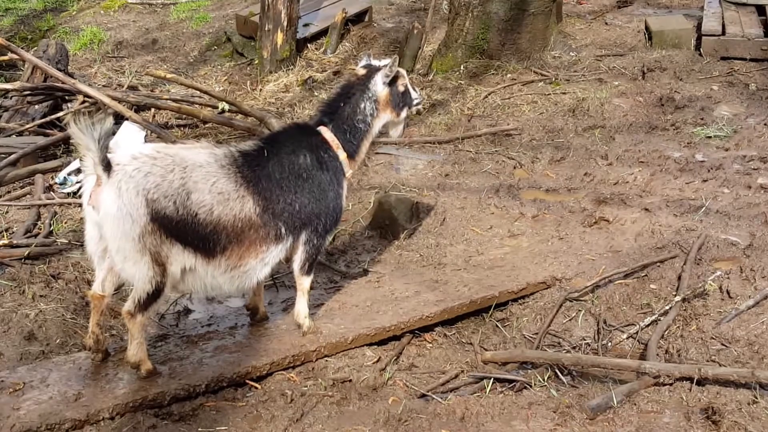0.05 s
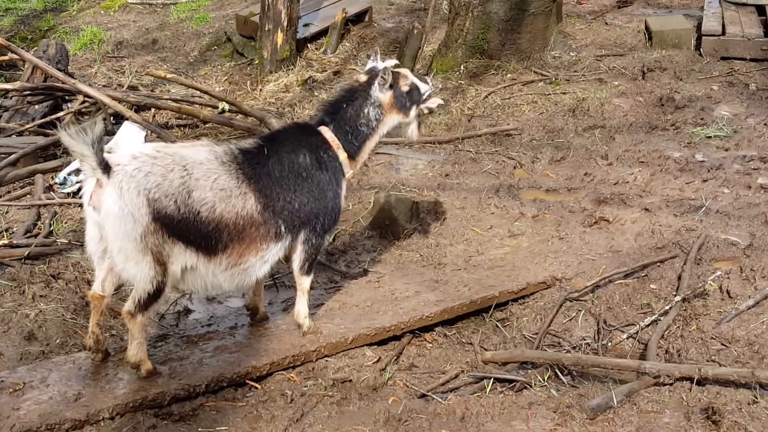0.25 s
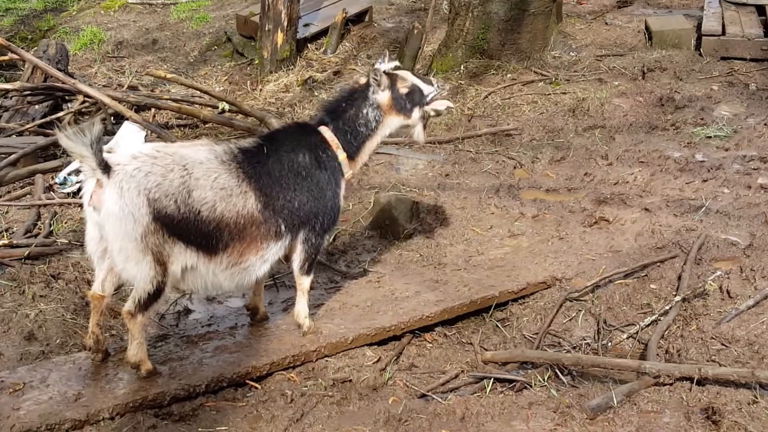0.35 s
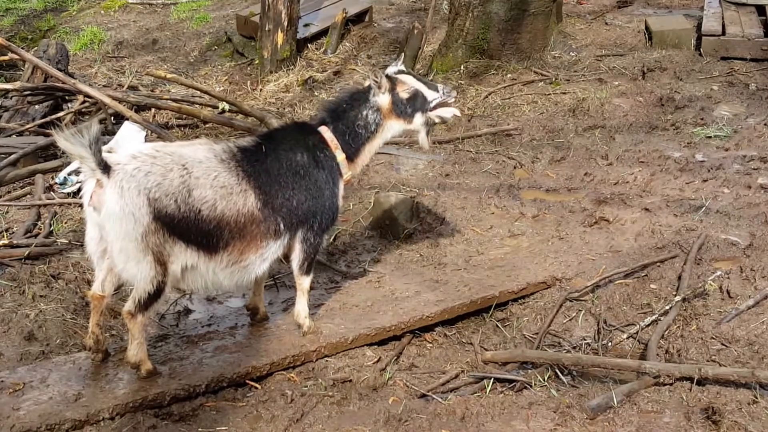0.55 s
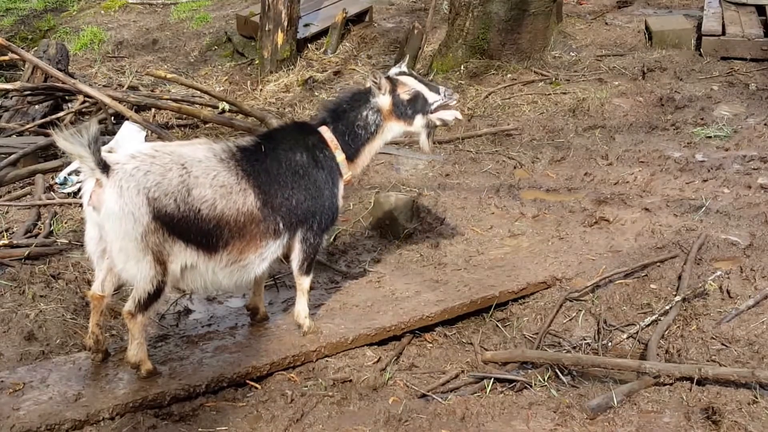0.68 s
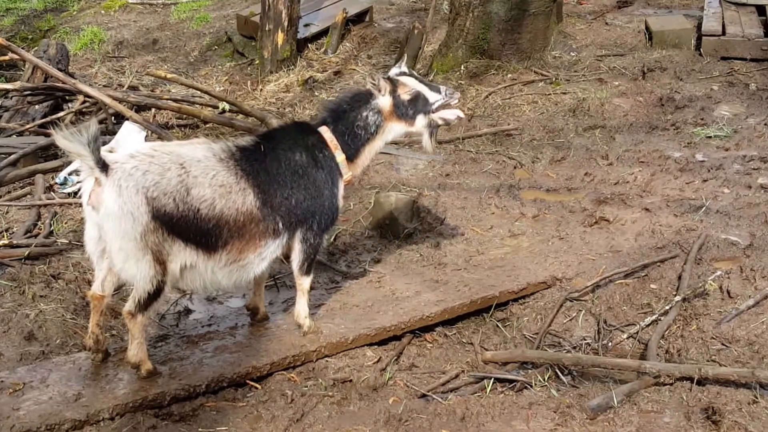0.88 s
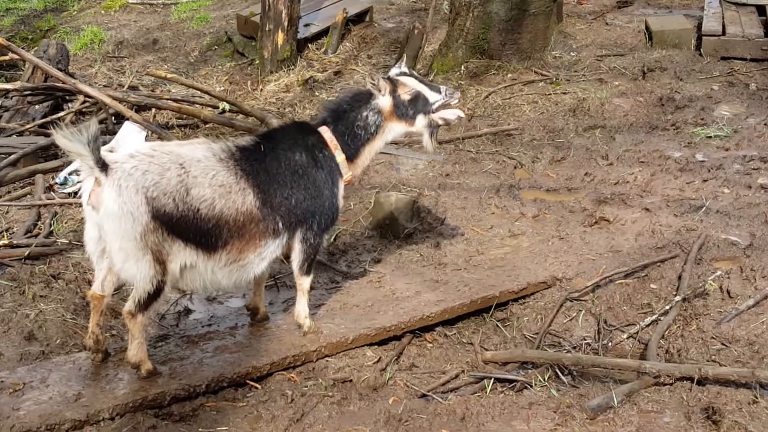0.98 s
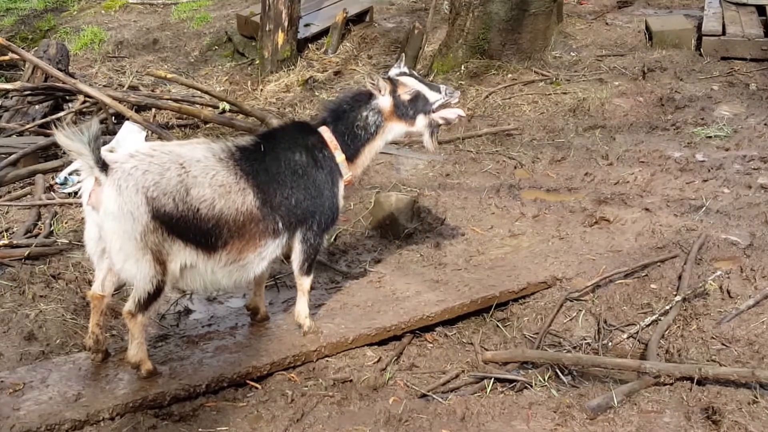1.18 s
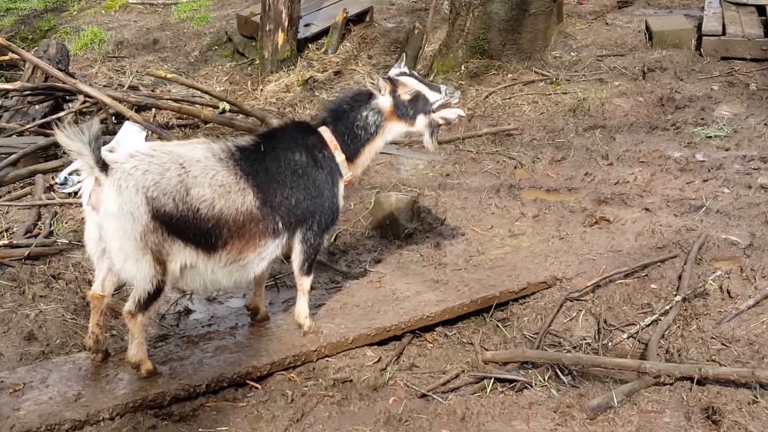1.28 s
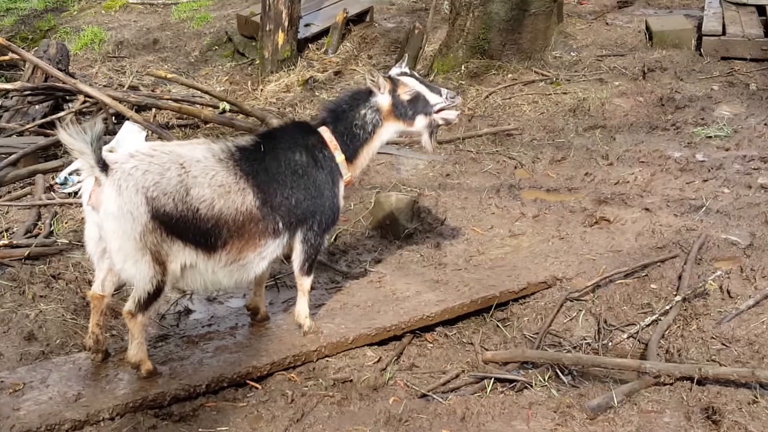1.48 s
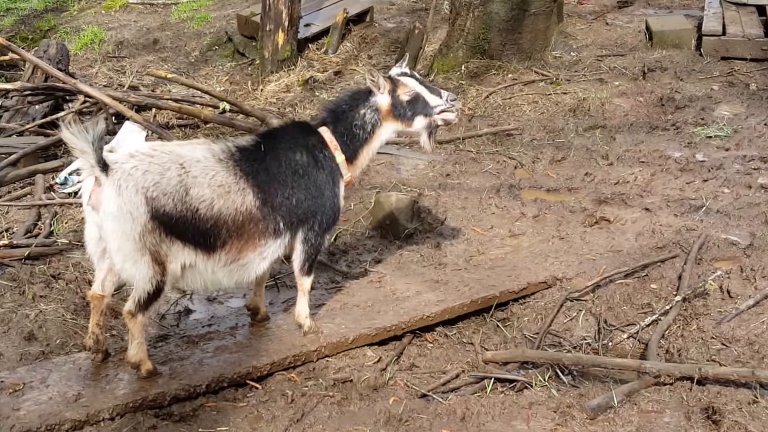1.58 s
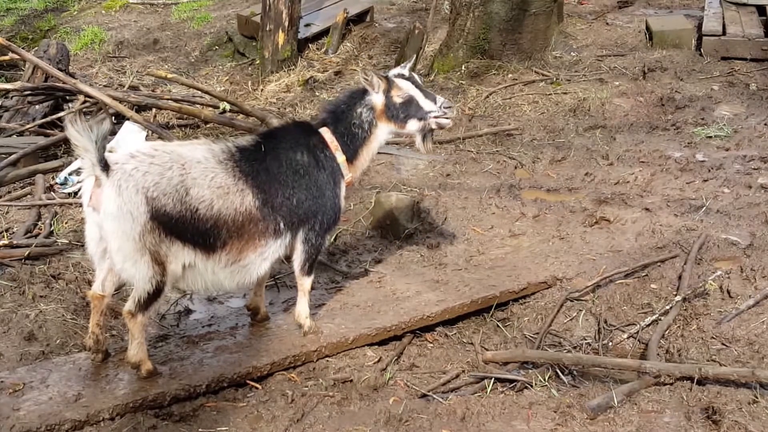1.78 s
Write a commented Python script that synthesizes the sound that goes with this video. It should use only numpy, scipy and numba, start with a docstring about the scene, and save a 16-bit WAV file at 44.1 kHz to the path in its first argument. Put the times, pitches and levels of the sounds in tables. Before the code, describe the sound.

One goat bleats a few metres away: a brief creaky start, a long rough scream, then a clearer wavering note that sinks and stops in a puff of breath. Quiet yard, light wind rumble on the stereo microphone.

```python
"""Goat bleating in a yard

A goat a few metres away gives one long bleat: a creaky start, a harsh irregular scream, then a clear
wavering note that sinks as the mouth closes. Vocal fold pulses and noise ring parallel resonances, with
breath hiss on top. Light wind rumbles at two microphone ports as shaped noise, sheds and trees return
a short broadband tail of scattered echoes, and a faint far hiss of steady noise lies under all."""
import sys
import numpy as np
from scipy import signal
from scipy.fft import rfft, irfft
from scipy.io import wavfile
from scipy.ndimage import uniform_filter1d
from numba import njit

SR = 44100
rng = np.random.default_rng(int(sys.argv[2]) if len(sys.argv) > 2 else 0)


def transcribe(signal):
    """Save signal, clipped to [-1, 1], as a 16-bit WAV file at the path in sys.argv[1]."""
    frames = np.atleast_2d(signal).T
    limited = np.clip(frames, -1, 1)
    pcm = np.round(limited * 32767).astype(np.int16)
    wavfile.write(sys.argv[1], SR, pcm)


def linear_from_db(decibels):
    """Turn decibels (scalar or array-like) into linear amplitude factors; 0 gives 1."""
    return 10 ** (np.asarray(decibels, float) / 20)


N = 81585


def rms_one(x):
    """Power normalisation: scale to rms 1."""
    return x / np.sqrt(np.mean(x ** 2) + 1e-20)


def in_time(rows):
    """Linear interpolation: the columns of a table as per-sample curves."""
    s, *columns = np.transpose(rows)
    return [np.interp(np.arange(N) / SR, s, c) for c in columns]


def at_hz(points, hz):
    """Interpolation of a table on a log-frequency axis."""
    table_hz, value = np.transpose(points)
    return np.interp(np.log(hz + 1), np.log(table_hz + 1), value)


def drift(rate_hz):
    """Low-passed noise: a slow random wander of rms 1, through two equal poles with run-in."""
    r = np.exp(-2 * np.pi * rate_hz / SR)
    return rms_one(signal.lfilter([1], [1, -2 * r, r * r], rng.standard_normal(2 * N))[N:])


def coloured(spectrum, x):
    """Spectral shaping: weight a flat signal by a table, silent outside its ends; rms 1."""
    hz = np.arange(N // 2 + 1) * SR / N
    inside = (hz > spectrum[0][0]) & (hz < spectrum[-1][0])
    return rms_one(irfft(rfft(x) * linear_from_db(at_hz(spectrum, hz)) * inside, N))


# Irregularity of the vocal folds. Each row: time in seconds, roughness from 0 to 1.
ROUGHNESS = [(.23, 1), (.34, .8), (.365, 1), (1.07, .9), (1.11, .2), (1.15, .2), (1.17, .45), (1.195, .2),
             (1.225, .2), (1.24, .35), (1.3, .35), (1.325, .05), (1.365, .06), (1.39, .35), (1.415, 1)]
# Mean vocal fold rate in the scream. Each row: time in seconds, rate in Hz.
SCREAM_RATE = [(.235, 316.1), (.28, 314.6), (.34, 333), (.365, 298), (.4, 302.5), (.445, 329.1),
               (.47, 303.3), (.6, 296.2), (1.0, 296.2), (1.07, 305)]
# Mean vocal fold rate in the clear note. Each row: time in seconds, rate in Hz.
NOTE_RATE = [(1.09, 316.8), (1.112, 315.7), (1.124, 322.7), (1.142, 341.6), (1.16, 348.2), (1.176, 329.7),
             (1.188, 330.3), (1.21, 319.1), (1.252, 339.3), (1.272, 331.7), (1.304, 328.5), (1.32, 318.8),
             (1.362, 314.2), (1.384, 291.1), (1.4, 270.0), (1.416, 242.2), (1.46, 236.2)]
VOICE_ON_S, VOICE_OFF_S = .232, 1.45
CREAK_PULSES, CREAK_START_S, CREAK_PERIOD_S = 10, .152, .0082
JITTER, JITTER_HZ = .09, 110   # relative wander of the fold rate at full roughness
SHIMMER_DB = 3   # largest random change of pulse strength at full roughness
ALTERNATE_DB, ALTERNATE_HZ = 3.5, 12   # spells of strong-weak pulses in the rough voice


def fold_pulses(rate, rough):
    """Quasi-periodic excitation: slow creaks, then closures with jitter, shimmer and alternation."""
    turns = np.cumsum(rate * (1 + JITTER * rough ** 1.3 * drift(JITTER_HZ))) / SR
    at = np.interp(np.arange(1, int(turns[-1])), turns, np.arange(N))
    at = at[(at > VOICE_ON_S * SR) & (at < VOICE_OFF_S * SR)]
    whole = at.astype(int)
    shimmer_db = SHIMMER_DB * rng.uniform(-1, 1, len(at))
    spells = np.clip(drift(ALTERNATE_HZ)[whole], 0, 1.5)
    alternate_db = ALTERNATE_DB * spells * (-1.) ** np.arange(len(at))
    # the square root of the period keeps the power independent of the rate
    size = linear_from_db(rough[whole] * (shimmer_db + alternate_db)) * np.sqrt(SR / rate[whole])

    creak_at = (CREAK_START_S + CREAK_PERIOD_S * np.arange(CREAK_PULSES)) * SR
    creak_size = linear_from_db(rng.uniform(-1.8, 1.2, CREAK_PULSES)) * np.sqrt(SR * CREAK_PERIOD_S)
    at, size = np.append(at, creak_at), np.append(size, creak_size)

    # windowed sinc: each pulse falls between samples without aliasing
    taps = np.floor(at)[:, None] + np.arange(-8, 9)
    off = taps - at[:, None]
    shape = size[:, None] * np.sinc(off) * np.cos(np.pi * off / 18) ** 2
    return np.bincount(taps.astype(int).ravel(), shape.ravel(), N)[:N]


FOLD_NOISE = .7   # noise share of the excitation at full roughness
STEADY_LEAK = .3   # share of fold noise between the puffs
NOISE_FROM_HZ, NOISE_LOW_SHARE = 1300, .45   # fold noise is weaker in the lows


def fold_noise(pulses, rough):
    """Pulse-modulated turbulence: noise in decaying puffs; returns noise, pulse share and puffs."""
    puffs = rms_one(signal.lfilter([1], [1, -np.exp(-1 / (.0026 * SR))], np.abs(pulses)))   # 2.6 ms decay
    share = FOLD_NOISE * rough
    white = (STEADY_LEAK + (1 - STEADY_LEAK) * puffs) * rng.standard_normal(N)
    high = signal.lfilter(*signal.butter(2, NOISE_FROM_HZ, "high", fs=SR), white)
    noise = share * (NOISE_LOW_SHARE * white + (1 - NOISE_LOW_SHARE) * high)
    return noise, np.sqrt(1 - share ** 2), puffs


@njit
def resonance(x, hz, r, sr):
    """Two-pole resonance whose centre and width move sample by sample."""
    y = np.zeros(len(x))
    for i in range(2, len(x)):
        drive = (1 - r[i] ** 2) / 2 * (x[i] - x[i - 2])
        ring = 2 * r[i] * np.cos(2 * np.pi * hz[i] / sr) * y[i - 1]
        y[i] = drive + ring - r[i] ** 2 * y[i - 2]
    return y


# Throat and mouth resonances, each passed twice, before the movements computed below.
# Each row: centre in Hz, width in Hz, gain in dB.
RESONANCES = [(553.6, 129, -15.5), (897.3, 181, 5.5), (1607, 263, -9.5), (2047.4, 216, 2.5),
              (3018, 593, -2), (3346, 252, -2.5), (3883, 157, 4.5), (4049, 97, 0.5), (410.4, 79, -19.5),
              (5830, 62, -30.5)]
# Gain movement of each resonance: 0 steady, 1 follows the lowest-resonance column of the effort,
# 2 follows its upper column, 3 grows with roughness.
GAIN_GROUPS = [3, 1, 0, 0, 0, 0, 2, 2, 3, 0]
# Closing of the mouth. Each row: time in seconds, scale of the lower resonance centres.
MOUTH_CLOSING = [(1.0, 1), (1.15, .99), (1.36, .96), (1.39, .91), (1.44, .76)]
LOWER_RESONANCES = 4   # the first rows sink as the mouth closes
LOWEST_SINKS = .55   # exponent: the lowest strong resonance sinks less
LOCK_MULTIPLE, LOCK_HZ, LOCK_SHARE = 3, 305, .39   # it follows this multiple of the fold rate in part
NOTE_ON_S, NOTE_LIFT_HZ, NOTE_LIFT_DB = 1.1, 180.24, 3   # the fifth and sixth rise in the clear note
WIDEN_FROM, WIDEN = .95, 6   # resonances broaden once the closing passes this scale
CHEST_CLEAR_DB = -2.5   # gain change of group 3 when the voice is clear
BETWEEN_DB, CLOSING_LEAK_DB = -26, 65   # noise leak between resonances, and its rise per unit of closing


def vocal_tract(pulses, noise, pulse_share, rate, rough, lowest_db, upper_db):
    """Source-filter principle: the fold excitation rings parallel, moving resonances."""
    closing, = in_time(MOUTH_CLOSING)
    note = np.clip((np.arange(N) / SR - NOTE_ON_S) / .04 + .5, 0, 1)
    moving_db = [0, lowest_db, upper_db, CHEST_CLEAR_DB * (1 - rough)]
    excitation = pulse_share * pulses + noise
    voice = linear_from_db(BETWEEN_DB + CLOSING_LEAK_DB * (1 - closing)) * noise
    for k, ((hz, width, db), group) in enumerate(zip(RESONANCES, GAIN_GROUPS)):
        lower = k < LOWER_RESONANCES
        centre = hz * (closing if lower else np.ones(N))
        if group == 1:
            follow = LOCK_SHARE * LOCK_MULTIPLE * np.maximum(rate - LOCK_HZ, 0)
            centre = hz * closing ** LOWEST_SINKS + follow
        if k - LOWER_RESONANCES in (0, 1):
            centre, db = centre + NOTE_LIFT_HZ * note, db + NOTE_LIFT_DB * note
        width = width * (1 + WIDEN * np.maximum(WIDEN_FROM - closing, 0))
        r = np.exp(-np.pi * width / SR)
        rung = resonance(resonance(excitation, centre, r, SR), centre, r, SR)
        polarity = 1 if lower else -1
        voice = voice + polarity * linear_from_db(db + moving_db[group]) * rung * np.sqrt(SR / width)
    return voice


def even_pressure(voice):
    """Automatic gain: band-limit the voice, then divide by its short-term rms above a floor."""
    band = signal.butter(4, [375, 5960], "band", fs=SR, output="sos")
    voice = rms_one(signal.sosfilt(band, voice))
    size = int(.015 * SR)   # 15 ms, averaged twice
    power = uniform_filter1d(uniform_filter1d(voice ** 2, size), size)
    return voice / np.sqrt(power + .1)


# Moments when the lowest strong resonance locks to the folds and sings.
# Each row: time in seconds, mean level in dB before the effort level.
SINGING_LEVEL = [(.25, -28), (.3, -2.5), (.34, 2), (.352, -18), (.41, -16), (.425, -2.5), (.445, -3),
                 (.46, -12.5), (1.07, -14.5), (1.09, -43.5)]
THROB_DB, THROB_HZ = 3, 30   # rms and rate of the level wander
SING_WANDER = .025   # relative rms wander of the sung pitch


def singing(rate):
    """Harmonic locking: a sine on a multiple of the fold rate, wandering in pitch and level."""
    db = in_time(SINGING_LEVEL)[0] + THROB_DB * drift(THROB_HZ)
    turns = np.cumsum(rate * (1 + SING_WANDER * drift(THROB_HZ))) / SR
    return linear_from_db(db) * np.sin(2 * np.pi * LOCK_MULTIPLE * turns)


# Breath above the resonances. Each row: frequency in Hz, relative gain in dB.
BREATH_COLOUR = [(2590, 0), (4400, -6.5), (5290, -8), (5900, -16.5), (6930, -18.5), (8690, -17.5),
                 (10800, -31.5), (14000, -36), (22000, -120)]
# Thin top of the breath. Each row: frequency in Hz, relative gain in dB.
AIR_COLOUR = [(6350, -41), (10800, 2.5), (11700, 5), (12900, -2), (14600, -5), (15600, -9)]
AIR_DB, AIR_FLICKER_DB, AIR_FLICKER_HZ = -36.5, 3.5, 54
HISS_GATE, HISS_OWN = .6, .5   # shares gated by the puffs and independent in each port
HISS_PULSES, CLEAR_PULSES = .25, 1.2   # weight of fold pulses in the breath, and extra in a clear voice


def breath_hiss(pulses, puffs, rough, hiss_db):
    """Turbulent jet noise: puff-gated noise and fold pulses, partly independent in the two ports."""
    shared, *own = (1 - HISS_GATE + HISS_GATE * puffs) * rng.standard_normal((3, N))
    breath = (HISS_PULSES + CLEAR_PULSES * (1 - rough)) * pulses
    breath = breath + (1 - HISS_OWN) * shared + HISS_OWN * np.array(own)
    air_db = AIR_DB + AIR_FLICKER_DB * drift(AIR_FLICKER_HZ)
    return linear_from_db(hiss_db) * coloured(BREATH_COLOUR, breath) + linear_from_db(air_db) * coloured(AIR_COLOUR, breath)


# Effort and mouth, in two successive parts. Each row: time in seconds, overall level in dB, lowest strong
# resonance in dB, upper resonances in dB, breath hiss in dB; the last three are relative.
EFFORT_PARTS = [
    [(0.13, -47.5, 4, -14, -1), (0.179, -35.5, -6, -21, -10), (0.187, -25, -10, -12, -13.5),
     (0.228, -24.5, -2.5, -25, -14), (0.238, -19, -0.5, -30, -20), (0.3, -17, -8.5, -39, -17)],
    [(0.32, -17, -7.5, -33, -18.5), (0.412, -16.5, -6, -19.5, -19), (0.87, -14.5, -9, -23, -21.5),
     (1.088, -15, -5, -14.5, -22), (1.104, -16, -20.5, -14, -19.5), (1.146, -14, -6.5, -31, -19),
     (1.168, -16.5, -3.5, -26, -22), (1.184, -16, -20, -7, -18), (1.212, -16, -9, -31, -19),
     (1.236, -15, -19, -11, -25.5), (1.276, -15.5, -7, -12, -22), (1.306, -15.5, -24, -15, -21),
     (1.328, -16, -8, -3, -19.5), (1.376, -16, 0, -0.5, -12), (1.412, -25.5, -14.5, -4, -5),
     (1.44, -25, 0.5, -6, -9), (1.47, -40, 2, -29, 16.5)],
]
BREATH_OFF_S = 1.449
EXHALE_DB, EXHALE_DB_PER_S = -7, -150   # breath that runs out after the voice stops


def bleat():
    """Superposition of voiced and turbulent sound under one effort curve."""
    level_db, lowest_db, upper_db, hiss_db = in_time(EFFORT_PARTS[0] + EFFORT_PARTS[1])
    (rate,), (rough,) = in_time(SCREAM_RATE + NOTE_RATE), in_time(ROUGHNESS)
    pulses = fold_pulses(rate, rough)
    noise, pulse_share, puffs = fold_noise(pulses, rough)
    lowest_db = lowest_db + THROB_DB * rough * drift(THROB_HZ)   # throbs when the voice is rough
    voice = vocal_tract(pulses, noise, pulse_share, rate, rough, lowest_db, upper_db)
    voice = even_pressure(voice) + singing(rate)
    hiss = breath_hiss(pulses, puffs, rough, hiss_db)
    after_s = np.arange(N) / SR - BREATH_OFF_S
    sounding = np.clip(-after_s / .01, 0, 1)
    exhale = linear_from_db(EXHALE_DB + EXHALE_DB_PER_S * np.maximum(after_s, 0))
    return linear_from_db(level_db) * (voice * sounding + hiss * np.maximum(sounding, exhale))


# Phase between the ports. Each row: frequency in Hz, lead of the left port in radians.
PORT_PHASE = [(0, 0), (860, 0), (1400, .6), (2050, .9), (2260, 1.3), (2410, -.1), (2560, -2.9),
              (2930, -2.1), (3080, 0), (3270, -1.3), (3450, -1.1), (3620, -.4), (4300, 0), (4480, 1.9),
              (4820, 1.4), (5100, 4), (5400, 5.8), (6200, 5.2), (7400, 3.8), (8900, 6.1), (11500, 9.9),
              (15000, 15)]
# Level between the ports. Each row: frequency in Hz, left over right in dB.
PORT_LEVEL = [(300, 2), (600, 0), (2100, 0), (2330, -3), (2540, 7), (2930, -5), (3230, 1), (3680, -9),
              (3960, -1), (4250, -6), (4450, -1), (7000, -5), (9000, -1), (12500, 1)]


def ports(x):
    """Interchannel differences: two microphone ports hear the goat with their own phase and level."""
    hz = np.arange(N // 2 + 1) * SR / N
    lead = np.interp(hz, *np.transpose(PORT_PHASE))
    half = linear_from_db(at_hz(PORT_LEVEL, hz) / 2) * np.exp(.5j * lead)
    return irfft(rfft(x) * np.array([half, 1 / half]), N)


def echoes(x, db, t60_s, delay_s):
    """Diffuse reverberation: convolution with a dying broadband noise response for each side."""
    t = np.arange(SR // 2) / SR
    decay = linear_from_db(-60 * t / t60_s) * (t > delay_s)
    scattered = rng.standard_normal((2, len(t))) * decay
    response = signal.lfilter(*signal.butter(1, 9000, fs=SR), scattered)
    response = signal.lfilter([1, -.4], [1], response)   # tilt towards the highs
    response = response / np.sqrt(np.sum(response ** 2, axis=1, keepdims=True))
    return linear_from_db(db) * signal.fftconvolve(x[None], response, axes=1)[:, :N]


# Strength of the wind. Each row: time in seconds, level in dB of the two ports' summed power.
WIND_LEVEL = [(0.0, -49), (0.03, -53.5), (0.272, -46), (0.514, -39), (0.53, -48.5), (0.658, -56),
              (0.694, -33), (0.762, -51), (0.814, -37), (0.838, -47.5), (1.056, -31), (1.102, -39),
              (1.35, -49.5), (1.472, -44.5), (1.53, -48.5), (1.69, -42), (1.85, -43)]
# Spectrum of the wind. Each row: frequency in Hz, relative density in dB per Hz.
WIND_SPECTRUM = [(12, -43), (20, -13), (86, 2), (198, -1), (282, -9), (400, -11), (450, -39), (580, -40),
                 (990, -120)]


def wind():
    """Turbulent pressure at the ports: lumpy low noise, independent left and right."""
    db, = in_time(WIND_LEVEL)
    lumps = linear_from_db(2.5 * np.array([drift(60), drift(51)]))   # 2.5 dB rms
    rumble = coloured(WIND_SPECTRUM, rms_one(lumps * rng.standard_normal((2, N))))
    return np.sqrt(2) * linear_from_db(db) * rumble


# Spectrum of the far hiss. Each row: frequency in Hz, relative density in dB per Hz.
FAR_SPECTRUM = [(120, -43), (231, -21), (258, -10.5), (564, -3), (1380, -8.5), (2510, -20.5), (3750, -18),
                (5110, -25.5), (15500, -46.5)]
# Likeness of its two sides. Each row: frequency in Hz, left-right correlation.
FAR_CORRELATION = [(300, 1), (1000, 0), (12000, 0.037)]


def far_hiss():
    """Partial coherence: steady distant noise, alike left and right only in the lows."""
    mid, side = rfft(rng.standard_normal((2, N)))
    alike = np.clip(at_hz(FAR_CORRELATION, np.arange(len(mid)) * SR / N), 0, 1)
    pair = np.sqrt(1 + alike) * mid + np.sqrt(1 - alike) * side * [[1], [-1]]
    return linear_from_db(-47) * coloured(FAR_SPECTRUM, irfft(pair, N))


def scene():
    """Linear superposition of the goat, its echoes, the wind and the far hiss."""
    goat = bleat()
    mono = goat.mean(axis=0)
    yard = echoes(mono, db=-21, t60_s=.5, delay_s=.015)
    ground_and_body = echoes(mono, db=-13, t60_s=.11, delay_s=.0049)
    return ports(goat) + yard + ground_and_body + wind() + far_hiss()


def low_pass(x):
    """Removes everything above the highest recorded frequency."""
    return signal.sosfilt(signal.butter(12, 15700, fs=SR, output="sos"), x)


def record(dry):
    """End of the signal chain: the finished mix becomes the output."""
    return low_pass(dry)


dry = scene()
out = record(dry)
transcribe(out)
```